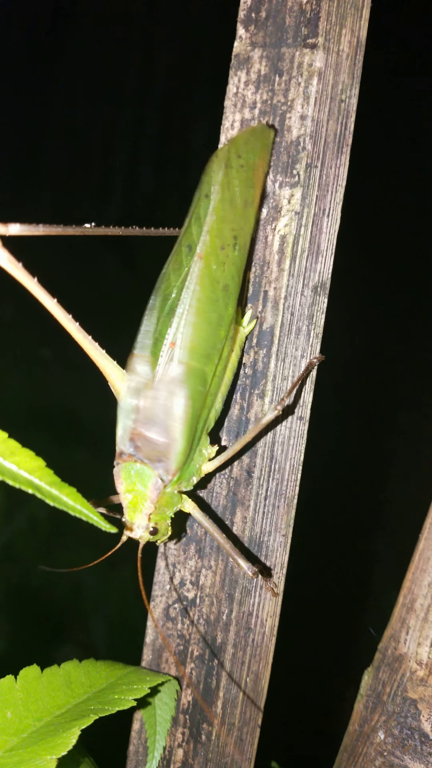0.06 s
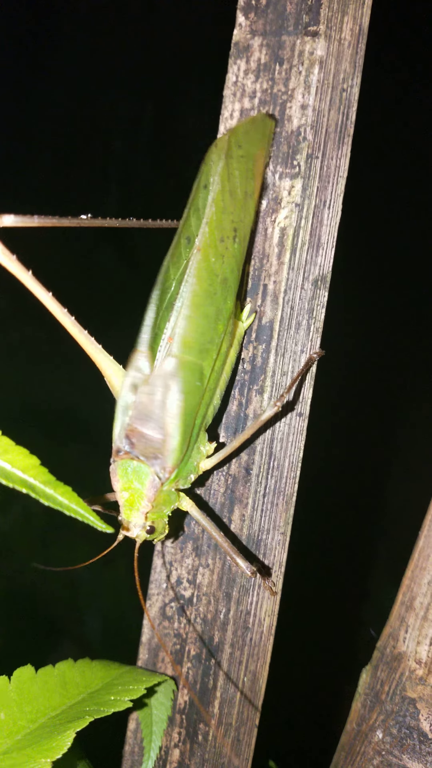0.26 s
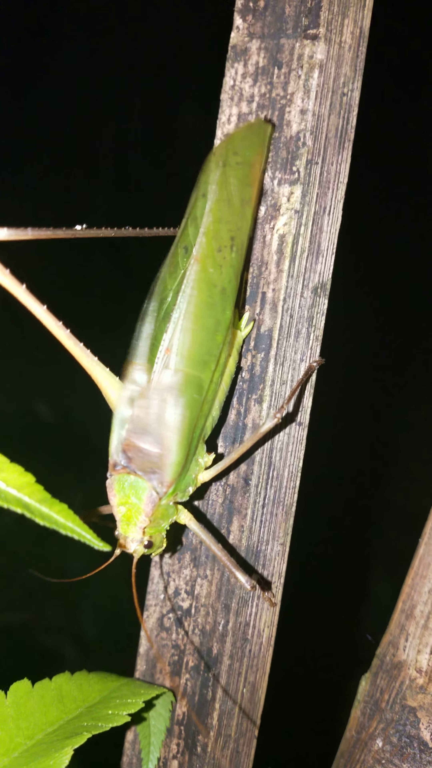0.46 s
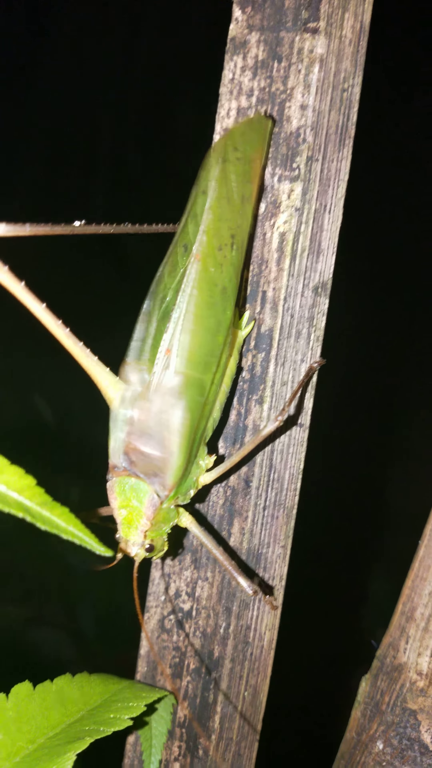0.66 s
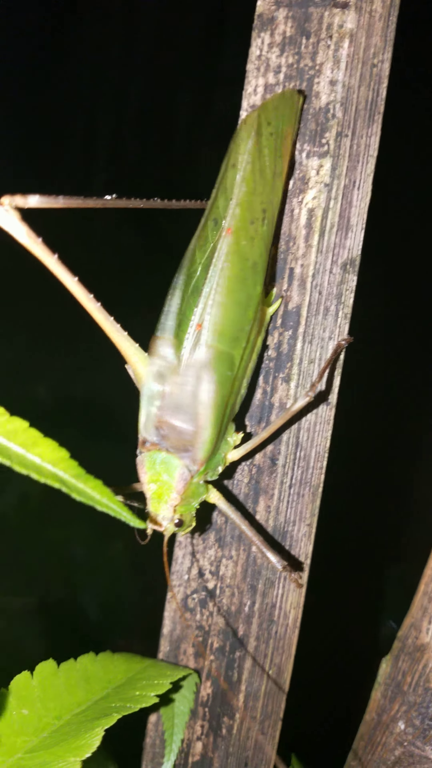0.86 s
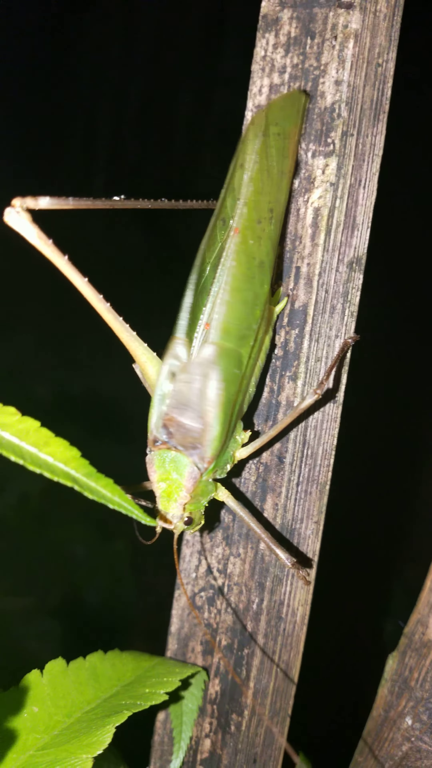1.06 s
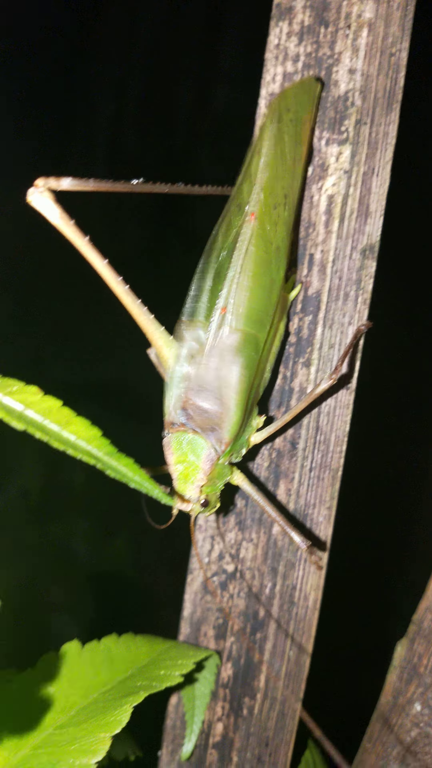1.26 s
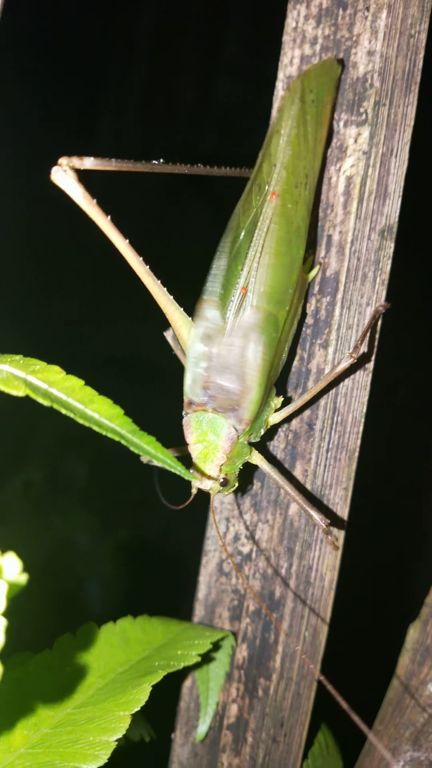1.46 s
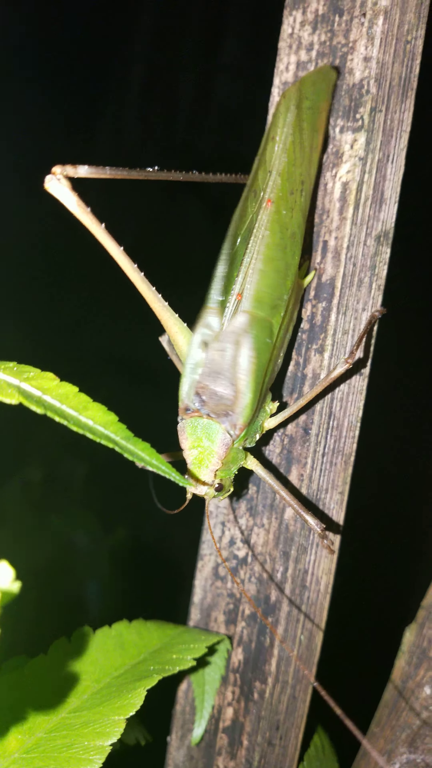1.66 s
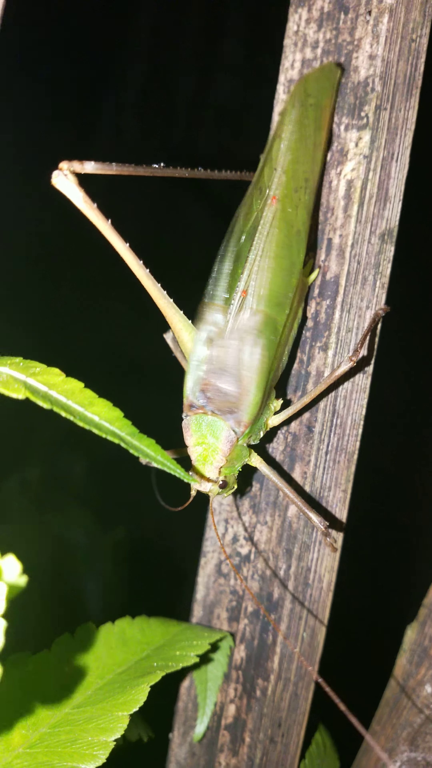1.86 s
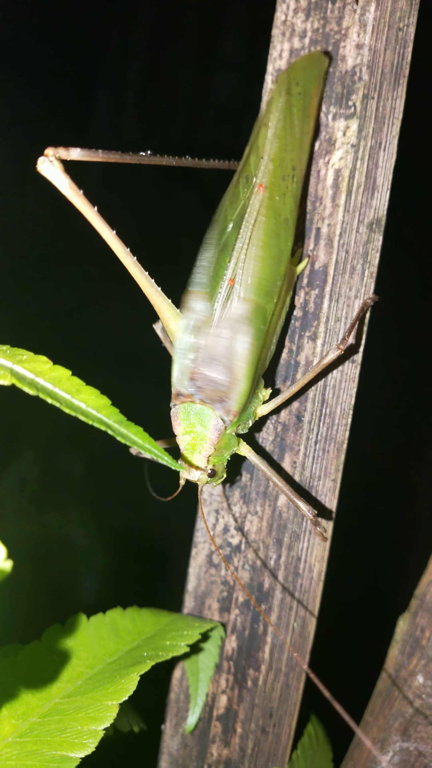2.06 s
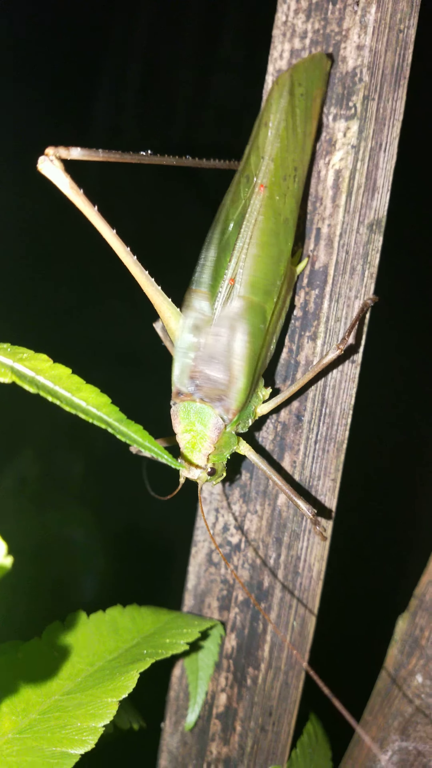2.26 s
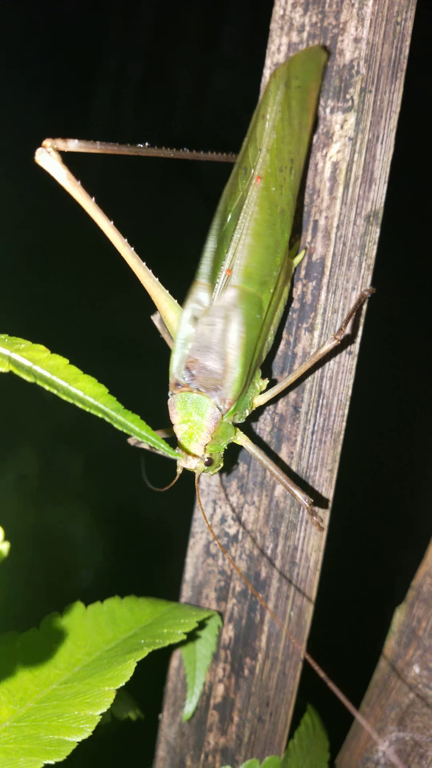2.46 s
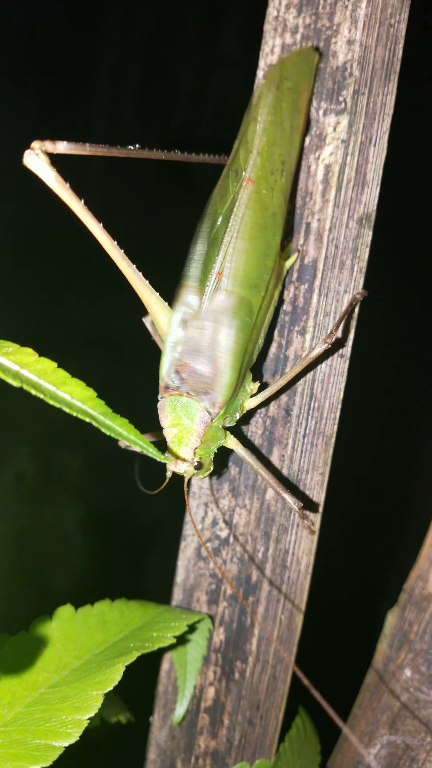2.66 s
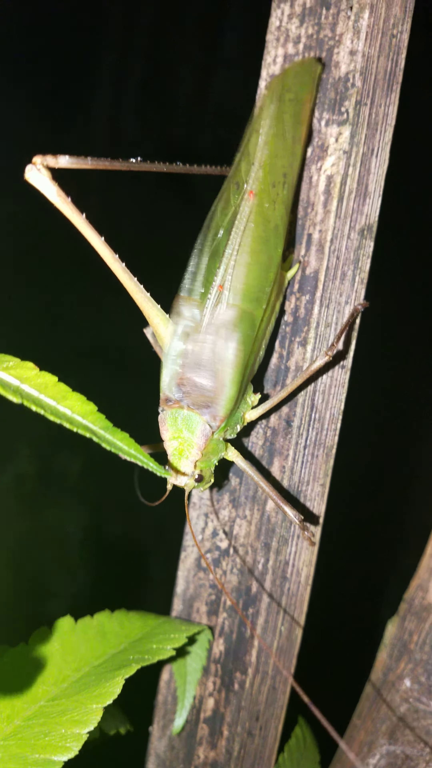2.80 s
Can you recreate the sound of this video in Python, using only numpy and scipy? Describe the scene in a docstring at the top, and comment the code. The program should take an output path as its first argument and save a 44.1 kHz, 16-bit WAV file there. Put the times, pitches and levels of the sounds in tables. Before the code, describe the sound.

From 0 to about 7.5 seconds a large katydid sings without stopping, a few centimetres from a stereo microphone at night. The sound is a loud, piercing, dry buzz, brightest around five to six kilohertz, with a thin sizzle above, fluttering steadily near twenty-nine pulses a second. Each pulse combines a toothy rasp with tiny ringing pips. The wings fan low, rough puffs of air, mostly on the right, like a rapid purring flutter. Sharp slaps cluster in the first 0.6 seconds, then become sparse, returning around 2.6 to 3.7 and sporadically from 5.3 to 7.4. The ring is slightly weaker around 0.3, fuller near 2, dips near 3.2, stays strong from 4.3 to 6.6 and eases near 7.3. The rasp and air gradually strengthen. Stereo colour shifts subtly; faint foliage echoes and night hush remain underneath, and the song continues to the end.

```python
"""On a wooden stake at night, a large katydid sings a few centimetres from a microphone with two ports.
Its forewings shut and open about 29 times a second. A scraper rasps along a file of teeth and shakes the wing,
and the thin wing membrane rings in short pips as the wings catch and turn. The beating wings also fan puffs
of air and sharp slaps, mostly onto the right port. Faint echoes and a hush of night air lie underneath."""
import sys
import numpy as np
from scipy import signal
from scipy.fft import rfft, irfft
from scipy.io import wavfile
from scipy.ndimage import uniform_filter1d, minimum_filter1d

SR = 44100
rng = np.random.default_rng(int(sys.argv[2]) if len(sys.argv) > 2 else 0)


def dump_mix(stems):
    """Bounce the given channels to the path in sys.argv[1] as a 16-bit WAV at rate SR."""
    frames = np.atleast_2d(stems).T  # one column per channel
    limited = np.clip(frames, -1, 1)  # hard clip at full scale
    pcm = np.round(limited * 32767).astype(np.int16)
    wavfile.write(sys.argv[1], SR, pcm)


N = 335160
TIME = np.arange(N) / SR  # seconds
HZ = np.fft.rfftfreq(N, 1 / SR)  # the frequencies of a whole-length spectrum

STROKES_PER_S = 28.73  # one stroke is one shutting and one opening
EFFORT_DB_PER_S = 0.2047  # the insect slowly works harder, and the rasp and the fanned air grow with it
DRAUGHT_DB = -24.5  # fanned air at the right port at mid-song
DRAUGHT_WAVER_DB, DRAUGHT_WAVER_HZ = 1.07, 19  # its chance waver: size and speed
EDGE_HZ = 15850  # nothing much is heard above this

# How far the wings run ahead of a steady beat. Each row: time in seconds, lead in strokes.
WING_LEAD = [(0, .05), (.4, -.04), (1.15, -.025), (2.1, -.185), (2.8, -.11), (3.9, -.09), (4.4, -.145),
             (5.05, -.145), (5.4, -.105), (6.1, -.105), (7, -.04), (7.6, -.035)]
# Slow swells of the song. Each row: time in seconds, ring of the wing membrane in dB,
# level of the lower skirt just below that ring in dB, level of the high sizzle in dB.
SONG_SWELLS = [(0, -3, 1, 4), (.3, -4.5, -1.5, 2.5), (.65, -3.5, -1.5, 3.5), (1.1, -3, -0.5, 3.5),
               (1.45, -1.4, -1.5, 3.5), (2, -1, 0.5, 3.5), (2.55, -1.5, -1, 3.5), (3.2, -3, -0.5, 2.5),
               (3.65, -2, -1, 4), (4.1, -2, -1.5, 0.5), (4.3, -0.5, -1, 2.5), (5.2, -1.1, 0.5, 2.5),
               (6.25, -1, 0.5, 3.5), (6.6, -0.9, -1.5, 3.5), (7.26, -3.5, 0.5, 5), (7.6, -2.5, -1.5, 4.5)]
# The scraper's travel in one stroke, shutting then opening.
# Each row: share of the stroke (0 to 1), pressure in dB, teeth per second.
SCRAPER_TRAVEL = [(0, -14, 1950), (.1, -12, 1980), (.135, -2.5, 2060), (.21, 2.3, 2110), (.29, -.2, 2265),
                  (.38, -3.6, 2390), (.43, -13, 2350), (.68, -15, 1950), (.735, -8, 1980),
                  (.82, -3.8, 2010), (.89, -5.5, 2070), (.95, -9, 2060), (1, -14, 1950)]
# The tones of the tooth strikes, which are alternately strong and weak.
# Each row: multiple of the tooth rate, level in dB.
STRIKE_TONES = [(1, -4), (2, -10.5), (2.5, -14), (3, -4), (4, -13), (5, -15), (6, -13), (7, -17)]
# What the scraped wing radiates. Each row: frequency in Hz, level in dB.
WING_COLOUR = [(1200, -21), (1750, -24), (2200, -9.5), (2700, -5.5), (3400, -16.5), (3800, -19),
               (4100, -9.5), (4400, -7.5), (4750, 5.5), (5800, 5.1), (6400, 3.2), (7000, -1), (7900, -28),
               (8600, -19), (11500, -27.5), (13200, -24), (14100, -9.5), (15100, -9)]
# The membrane's pips where the wings catch, turn and skip open. Each row: share of the stroke (0 to 1),
# typical half length in seconds, level in dB, pitch in Hz, glide in Hz per second.
MEMBRANE_PIPS = [(.056, .0009, -1.2, 5790, 0), (.522, .0013, -.2, 5560, -130000),
                 (.588, .0006, .8, 5720, 200000), (.73, .0006, -14, 5750, 0), (.79, .0006, -11, 5950, 0),
                 (.85, .0006, -10.5, 6000, 0), (.955, .0008, -7, 5520, 0)]
# The balance of the two ports. Each row: frequency in Hz, left minus right in dB.
PORT_BALANCE = [(1750, -20), (1950, 2), (2170, 4.5), (3300, -7.5), (3950, -2.5), (4400, -5.5), (4800, 1),
                (5150, 11.5), (5600, -5), (6300, -7), (7000, 3), (9000, 0), (10500, 13.5), (12000, -24),
                (12800, -16), (14000, 0.5), (15500, -14)]
# The timing of the two ports. Each row: frequency in Hz, radians by which the left leads.
PORT_LEAD = [(2100, 1), (3300, .5), (4200, 0), (4550, -2.3), (5000, -2.9), (6100, -6.1), (7050, -9.4),
             (8800, -12.4), (10000, -15.7), (14600, -19), (15800, -21.4)]
# The hand-held microphone drifts.
# Each row: time in seconds, radians by which the song's lower skirt turns toward the left port.
HAND_DRIFT = [(0, 1.4), (.5, 1.35), (1, 0.77), (1.5, 0.44), (4.4, -0.023), (5.2, -0.11), (6.4, 0.074),
              (6.7, 0.9), (7.6, 0.8)]
# Puffs of air in one stroke. Each row: share of the stroke (0 to 1), half length in seconds, level in dB,
# signed push (a ratio), typical length of the front in seconds, dB gained per dB of the membrane's ring.
AIR_PUFFS = [(.06, .0011, -8, -.4, .0003, 1), (.21, .0021, -1.6, 1.1, .0007, -.4),
             (.265, .0008, -2.5, 0, .0003, -.4), (.22, .004, -17, .9, .0005, 0),
             (.35, .002, -17, 0, .0003, 0), (.508, .0016, -4.8, -1.7, .0004, 1),
             (.58, .0007, -1.7, .8, .00015, 1.1)]
# Wing beats whose puffs hit the port squarely or miss it. Each row: time in seconds, extra level in dB.
GUSTY_BEATS = [(.11, -3), (.32, -3), (.36, -4), (1.72, 5), (1.86, -2.5), (1.89, 4.5), (2.17, 1),
               (2.45, 1.5), (3.21, -7.5), (3.25, -6), (3.67, -1.5), (3.74, 1.5), (4.15, 0.5), (4.47, 4),
               (7.08, -4.5), (7.32, -10)]
# The colour of the turbulence on the port. Each row: frequency in Hz, level in dB.
EDDY_COLOUR = [(20, -57), (60, 4), (150, -1.5), (400, -4.5), (850, -11), (1600, -15), (3000, -15.5),
               (5000, -33.5), (9000, -30)]
# How the port answers a shove of air. Each row: frequency in Hz, level in dB.
SHOVE_COLOUR = [(25, -5), (60, -4), (90, 2), (130, 3.5), (250, 1.5), (1800, 12.5), (7000, -34)]
# Shutting beats that slap the port with a sharp crack.
# Each row: time in seconds, level in dB relative to the shared slap level.
SHARP_SLAPS = [(0.0404, -2.5), (0.0772, -7), (0.147, -0.5), (0.1823, 2), (0.2168, 0), (0.2516, -1.5),
               (0.2882, -2.5), (0.4975, -5.5), (0.5305, 0), (0.5668, 0), (1.1591, -1.5), (2.5539, 1),
               (2.6924, -6), (2.8289, -4), (3.177, -3), (3.2816, -3), (3.3526, -4.6), (3.3874, -2),
               (3.4574, 0), (3.6643, 1.5), (3.7338, 2), (5.2659, -3), (5.4073, -3), (5.9986, -1),
               (6.2775, 1), (6.3134, -4), (6.6215, -9), (6.728, -2), (6.8649, 1), (7.1104, -5.0),
               (7.2493, -3), (7.3537, -4.8)]
# The colour of the night air. Each row: frequency in Hz, level in dB.
NIGHT_COLOUR = [(20, -22), (110, -15), (300, -9), (1000, -27), (3000, -39), (7500, -35), (8600, 10),
                (16000, -41)]


def gain_of(db):
    """Turns decibels into an amplitude factor."""
    return 10 ** (np.asarray(db) / 20)


def evened(x):
    """Scales to an rms (average strength) of 1."""
    return x / np.sqrt(np.mean(x ** 2) + 1e-20)


def read(points):
    """Joins the points of a short spectrum by straight lines on a log-frequency axis."""
    hz, value = np.transpose(points)
    return np.interp(np.log(HZ + 1), np.log(hz), value)


def band(x, points):
    """Keeps a band of frequencies; the points give the share kept at each frequency in Hz."""
    return irfft(rfft(x) * read(points), N)


def follow(rows, at=TIME):
    """Joins the columns of a table by straight lines along its first column."""
    s, *columns = np.transpose(rows)
    return [np.interp(at, s, column) for column in columns]


def colour(x, points):
    """Filters by a spectrum in dB, with the phase that makes the ringing come after the blow."""
    log_gain = np.log(gain_of(read(points)))
    both_sides = np.r_[log_gain, log_gain[-2:0:-1]]
    lag = signal.hilbert(both_sides).imag[:len(HZ)]
    return irfft(rfft(x) * np.exp(log_gain - 1j * lag), N)


def waver(hz):
    """Random wandering of rms 1, mostly slower than hz."""
    spectrum = rfft(rng.standard_normal(N)) / (1 + (HZ / hz) ** 4)
    return evened(irfft(spectrum, N))


def nearest(strokes, share):
    """For an event once in every stroke: the number of the nearest one, and the seconds since it."""
    which = np.round(strokes - share)
    seconds = (strokes - share - which) / STROKES_PER_S
    return which.astype(int) + 2, seconds  # the 2 keeps the numbers above zero


def effort_db():
    """A steady rise in effort, zero at mid-song."""
    return EFFORT_DB_PER_S * (TIME - TIME.mean())


def lower_skirt(x):
    """The part of the song just below the membrane's ring."""
    return band(x, [(4000, 0), (4400, 1), (5150, 1), (5650, 0)])


def night(floor_db=-47, left_db=-5):
    """A faint, even hush of moving air, made of coloured noise."""
    hush = evened(colour(rng.standard_normal((2, N)), NIGHT_COLOUR))
    return gain_of(floor_db) * gain_of([[left_db], [0]]) * hush


def rasp(strokes, drift=0.022, stroke_db=1):
    """The scraper trips over the file's teeth, faster as the wings shut; strikes and rubbing shake the wing."""
    jitter = .021  # fast unevenness of the tooth rate; drift is the slower part, both as shares of it
    grit, grit_follow = .7, .42  # strength of the rubbing, and how far it follows the pressure
    uneven_db, tone_db = 1.0, 1.3
    pressure_db, teeth_hz = follow(SCRAPER_TRAVEL, strokes % 1)
    tone_waver = waver(40)
    uneven_rate = 1 + jitter * waver(672) + drift * waver(29.83)
    teeth = np.cumsum(teeth_hz * uneven_rate) / SR  # teeth passed so far
    strikes = 0
    for multiple, db in STRIKE_TONES:
        swell_db = tone_db * np.roll(tone_waver, rng.integers(N))  # each tone swells at its own times
        strikes = strikes + gain_of(db + swell_db) * np.cos(2 * np.pi * multiple * teeth)
    strikes = strikes * gain_of(pressure_db + stroke_db * waver(15.0))
    rubbing = grit * rng.standard_normal(N) * gain_of(grit_follow * pressure_db)
    shaking = (strikes + rubbing) * gain_of(uneven_db * waver(530))
    return evened(colour(shaking, WING_COLOUR))


def pips(strokes):
    """The membrane swells into a few clean cycles, each time a little different, and flatter when it rings weakly."""
    slip_s, reach_s = .00035, .005  # chance shift in time, and how far from its middle a pip is computed
    uneven_db, detune = 1.3, .024  # chance changes of level, and of pitch as a share
    overtone_db, sag_per_db = -30, .009  # octave level, and share of pitch lost per dB
    out = np.zeros(N)
    tuning = 1 + sag_per_db * follow(SONG_SWELLS)[0]
    for share, half_s, db, hz, glide in MEMBRANE_PIPS:
        which, t = nearest(strokes, share)
        near = abs(t) < reach_s
        chance = rng.standard_normal((which.max() + 1, 5))  # one row for each pip
        late, loud, sharp, long, start = chance[which[near]].T
        t = t[near] - slip_s * late
        half = half_s * np.exp(.15 * long)
        pitch_hz = hz * (tuning[near] + detune * sharp)
        turns = pitch_hz * t + glide * t ** 2 / 2 + start
        swell = gain_of(db + uneven_db * loud) * np.exp(-abs(t / half) ** 2.5)
        octave = gain_of(overtone_db) * np.sin(4 * np.pi * turns)
        out[near] += swell * (np.sin(2 * np.pi * turns) + octave)
    return evened(out)


def song(strokes, body_db=0.5):
    """The membrane's ring, the rasp around it and the high sizzle swell as the wings change their set."""
    rasp_db, pips_db = -18.7, -18.7
    pips_follow = .8  # dB of pips per dB of ring
    ring_db, skirt_db, sizzle_db = follow(SONG_SWELLS)
    scraped = rasp(strokes)
    ring = band(scraped, [(5000, 0), (5500, 1), (6500, 1), (7100, 0)])
    sizzle = band(scraped, [(11000, 0), (13000, 1)])
    body = scraped - ring - sizzle
    scrape = body * gain_of(body_db + effort_db()) + ring * gain_of(ring_db) + sizzle * gain_of(sizzle_db)
    ringing_pips = gain_of(pips_db + pips_follow * ring_db) * pips(strokes)
    sound = gain_of(rasp_db) * scrape + ringing_pips
    return sound + lower_skirt(sound) * (gain_of(skirt_db) - 1)


def ports(x, treble_db_per_radian=2.0, treble_turn=1.5):
    """So near, each port hears the wings with its own colour and delay, which shift as the hand drifts."""
    half = gain_of(read(PORT_BALANCE) / 2) * np.exp(.5j * read(PORT_LEAD))
    pair = irfft(rfft(x) * np.array([half, 1 / half]), N)  # left, then right
    drift = follow(HAND_DRIFT)[0]
    turn = .5j * drift * np.array([[1], [-1]])
    skirt = lower_skirt(pair)
    treble = band(pair, [(7000, 0), (7500, 1)])
    facing = gain_of(treble_db_per_radian * drift * np.array([[1], [0]]))  # left treble only
    turned_skirt = signal.hilbert(skirt) * np.exp(turn)
    turned_treble = facing * signal.hilbert(treble) * np.exp(treble_turn * turn)
    return pair - skirt - treble + (turned_skirt + turned_treble).real


def wander(x):
    """The colour at each port wanders: narrow bands swell and sink for a moment, less so around the ring."""
    depth_db, band_hz, hold_s = 1.4, 190, .14
    hz, t, z = signal.stft(x, SR, nperseg=512)
    patches = rng.standard_normal(z.shape)
    for axis, size in 2 * [(1, round(band_hz / hz[1])), (2, round(hold_s / t[1]))]:
        patches = uniform_filter1d(patches, size, axis, mode="wrap")
    depth_share = np.interp(hz, [5000, 5500, 6300, 6800], [1, .4, .4, 1])[:, None]
    changed = z * gain_of(depth_db * depth_share * evened(patches))
    return signal.istft(changed, SR, nperseg=512)[1][:, :N]


def foliage(x, count=4):
    """A brief scatter off the stake and the leaves: several sets of decaying random echoes fade in and out."""
    t60, shifts_per_s = .08, 5  # seconds for the echoes to fall by 60 dB, and fades per second
    t = TIME[:SR // 10]
    tails = rng.standard_normal((count, 2, len(t))) * gain_of(-60 * t / t60) * (t > .001)
    tails /= np.linalg.norm(tails, axis=2, keepdims=True)
    out = 0
    for k, tail in enumerate(tails):
        fade = np.cos(np.pi * (shifts_per_s * TIME + k / count)) * np.sqrt(2 / count)
        out = out + signal.oaconvolve(x * fade, tail, axes=1)[:, :N]
    return out


def fanned_air(strokes, effort_follow=0.85, left_db=-14.5, push_db=0, left_push=0.038,
               eddy_share=0.68, eddy_follow=1.7):
    """Wing beats shove air, mostly at the right port: pressure flips at a steep front amid a burst of eddies."""
    scatter_s, uneven_db = .0007, 1.4  # chance shifts in time and level
    ring_db = follow(SONG_SWELLS)[0]
    gust_db = np.zeros(int(strokes[-1]) + 5)  # one value for each beat
    for s, db in GUSTY_BEATS:
        gust_db[int(np.interp(s, TIME, strokes)) + 2] = db
    burst, push = np.zeros(N), np.zeros(N)
    for share, half_s, db, shove, front_s, with_ring in AIR_PUFFS:
        which, t = nearest(strokes, share)
        late, loud, soft = rng.standard_normal((which.max() + 1, 3))[which].T
        t = t - scatter_s * late
        size = gain_of(db + with_ring * ring_db + gust_db[which] + uneven_db * loud)
        burst += size * np.exp(-.5 * (t / (eddy_share * half_s)) ** 2)
        front = np.tanh(t / (front_s * np.exp(.5 * soft)))
        push += shove * size * np.exp(-abs(t) / half_s) * front
    eddies = evened(colour(burst * rng.standard_normal((2, N)), EDDY_COLOUR))
    eddies = gain_of(eddy_follow * effort_db()) * eddies
    shoves = gain_of(push_db) * evened(colour(push, SHOVE_COLOUR)) * np.array([[left_push], [1]])
    draught_db = DRAUGHT_DB + effort_follow * effort_db() + DRAUGHT_WAVER_DB * waver(DRAUGHT_WAVER_HZ)
    return evened(eddies + shoves) * gain_of(draught_db) * gain_of([[left_db], [0]])


def slaps(strokes, level_db=-5.5, usual_db=-11.0, half_s=0.00052):
    """As the wings shut, a brief suction snaps into a spike of pressure; most are faint, a few land squarely."""
    share, scatter_s, uneven_db = .235, .0008, 3  # place in the stroke, chance shifts in time and level
    front_s, lean, left = .0001, .35, .05  # length of the snap, tilt toward pressure, share at the left port
    which, t = nearest(strokes, share)
    late, loud = rng.standard_normal((which.max() + 1, 2))[which].T
    t = t - scatter_s * late
    slap_db = usual_db + uneven_db * loud
    for s, db in SHARP_SLAPS:
        this = which == which[int(s * SR)]
        t[this] = TIME[this] - s
        slap_db[this] = db
    snap = np.exp(-abs(t) / half_s) * (np.tanh(t / front_s) + lean)
    return gain_of(level_db + slap_db) * snap * np.array([[left], [1]])


def scene(scatter_db=-12):
    """One wing beat drives the song, the fanned air and the slaps."""
    strokes = STROKES_PER_S * TIME + follow(WING_LEAD)[0]
    insect = wander(ports(song(strokes)))
    echoes = gain_of(scatter_db) * foliage(insect)
    return insect + echoes + fanned_air(strokes) + slaps(strokes) + night()


def record(dry):
    """A fast limiter turns down the tallest peaks at each port; then the highest treble is cut off."""
    ceiling = .85
    room_left = np.minimum(1, ceiling / (abs(dry) + 1e-9))
    held = dry * uniform_filter1d(minimum_filter1d(room_left, size=25), size=25)
    low_pass = signal.firwin(701, EDGE_HZ, window=("kaiser", 9), fs=SR)
    return signal.oaconvolve(held, low_pass[None], "same")


dry = scene()
out = record(dry)
dump_mix(out)
```